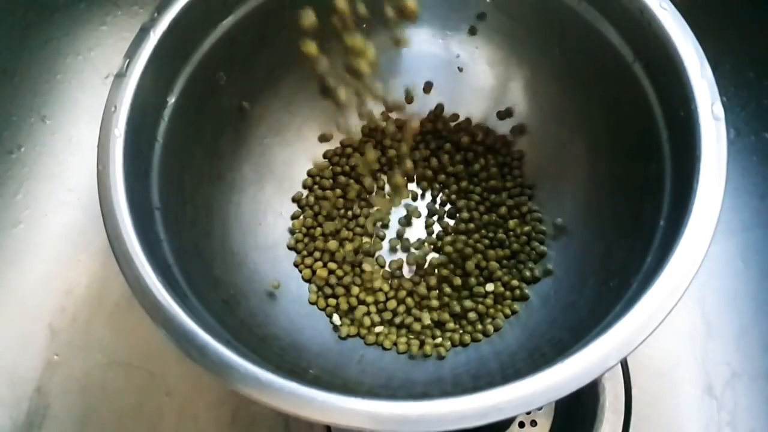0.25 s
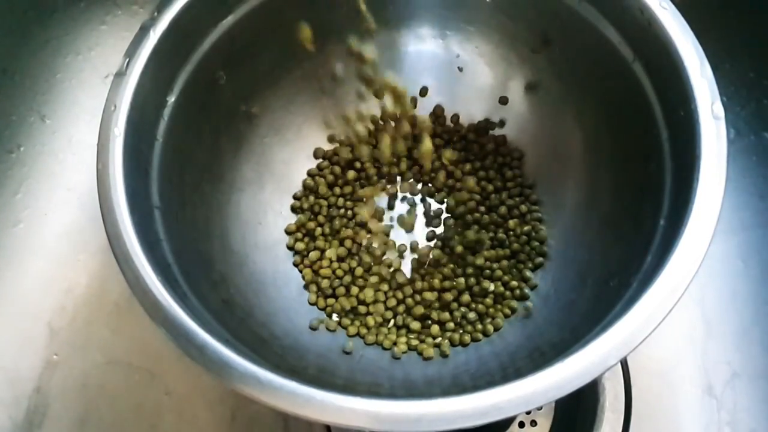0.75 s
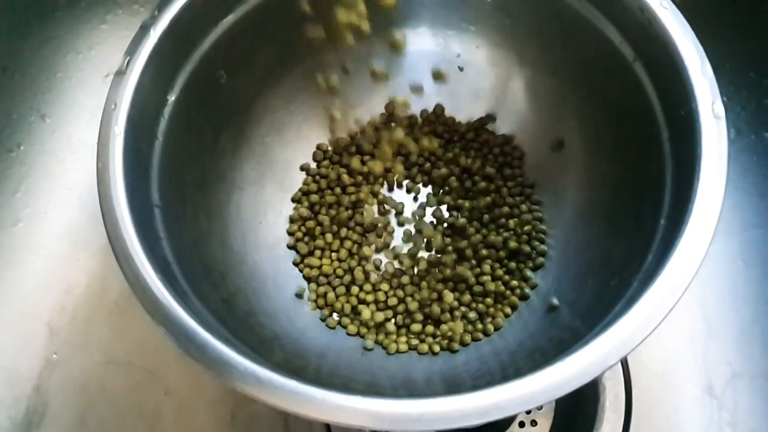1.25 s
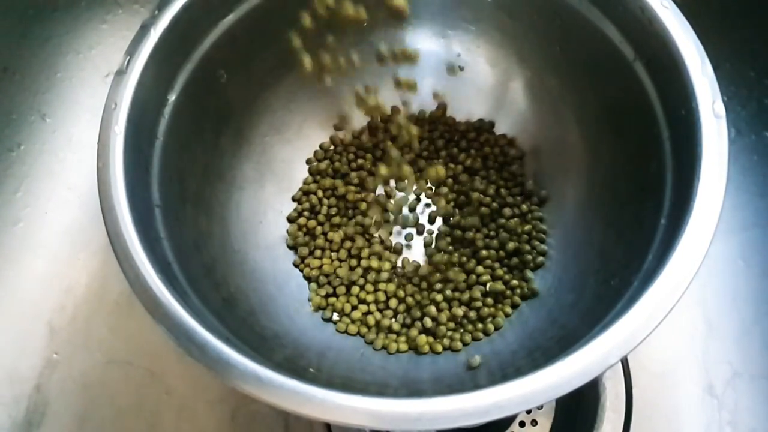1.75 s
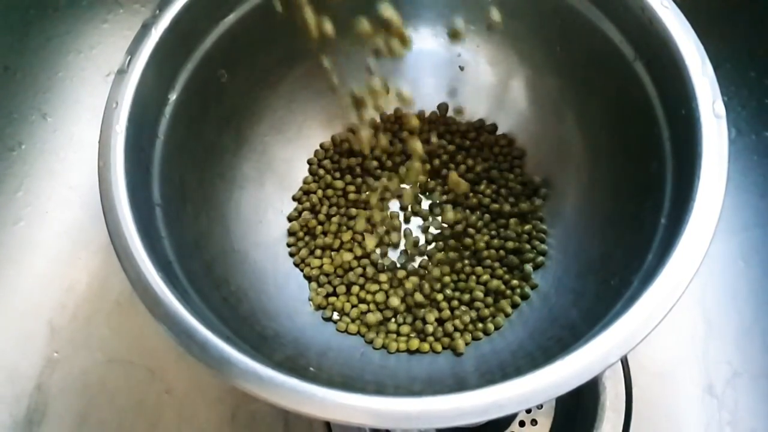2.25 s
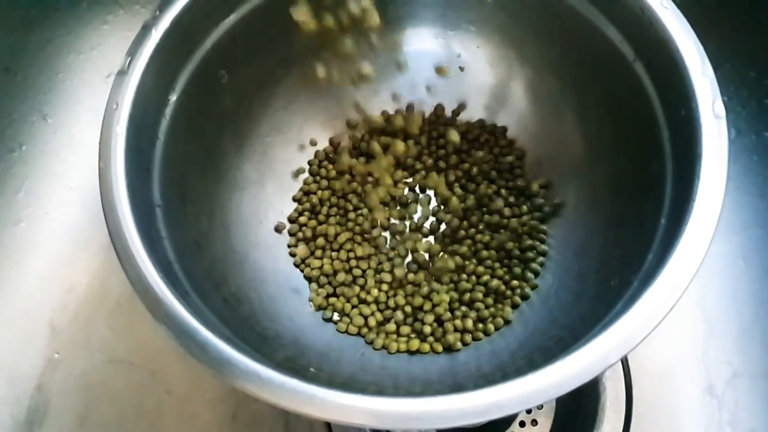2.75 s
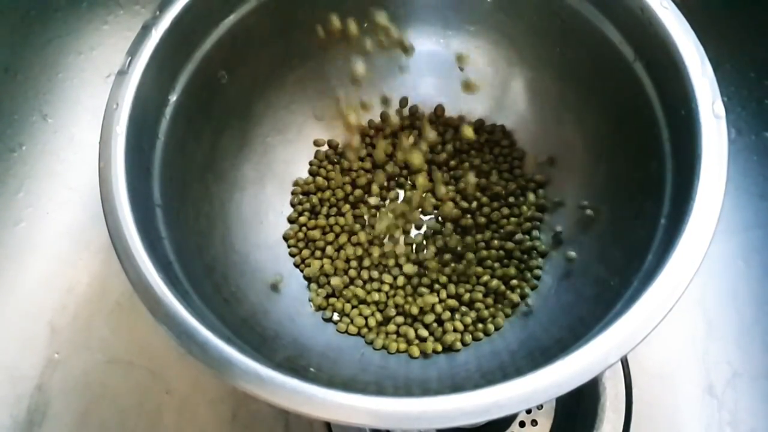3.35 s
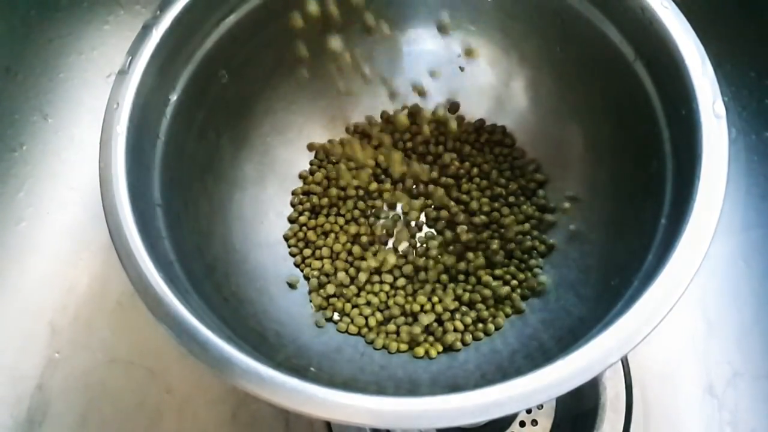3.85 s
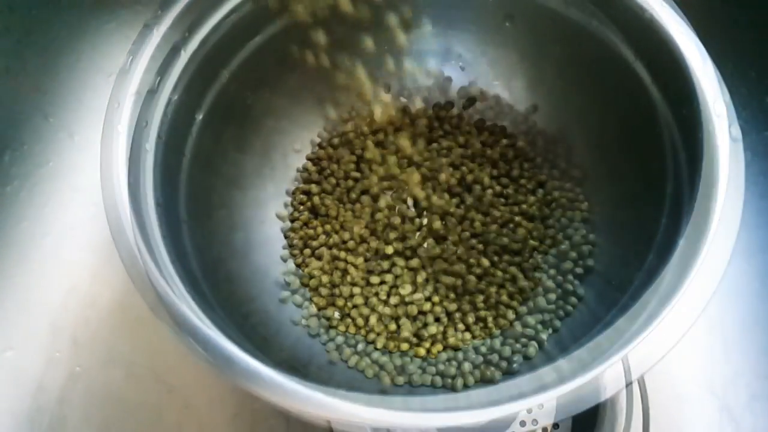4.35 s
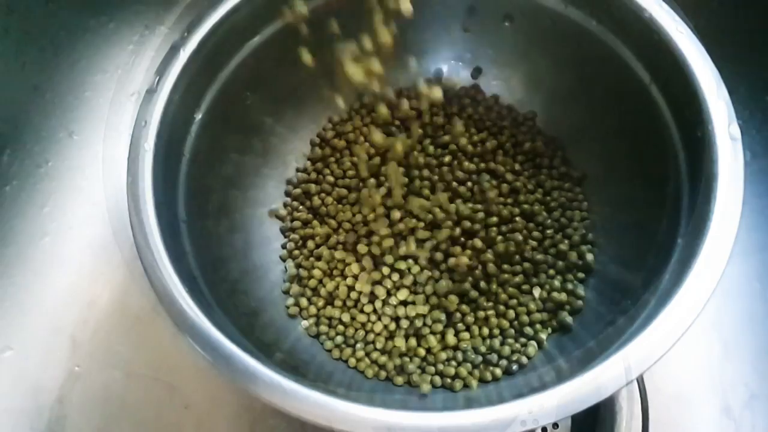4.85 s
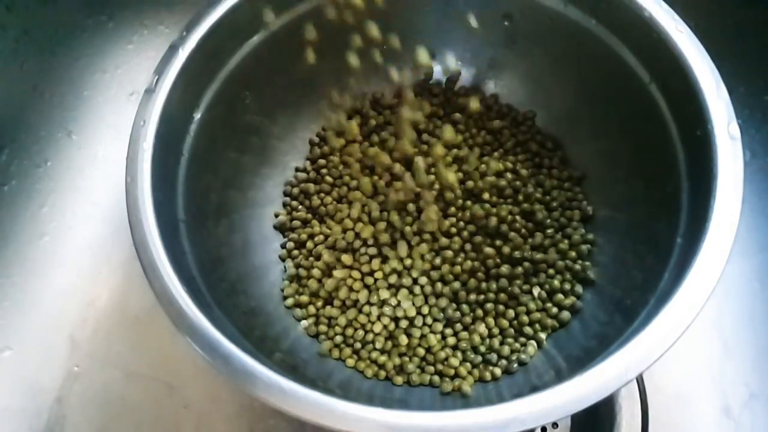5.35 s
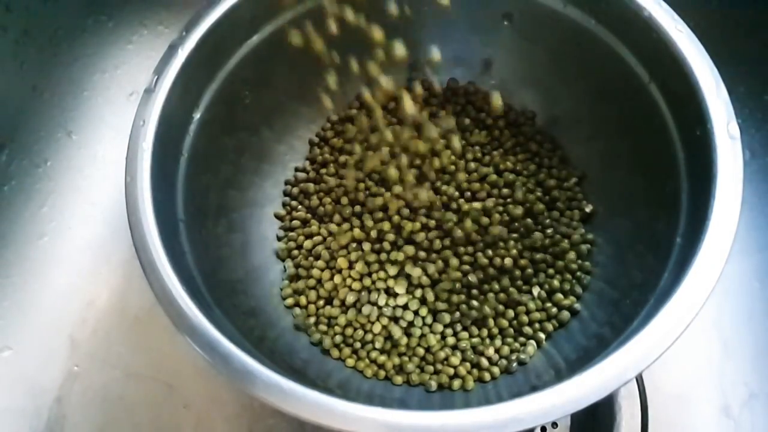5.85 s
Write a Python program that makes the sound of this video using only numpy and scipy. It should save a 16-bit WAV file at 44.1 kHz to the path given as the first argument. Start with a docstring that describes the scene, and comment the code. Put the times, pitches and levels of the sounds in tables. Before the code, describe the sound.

A close, loud clatter of beans poured into a metal bowl in a small hard room. The flow is uneven, with tiny surges and lulls. Early clumps make the steel bottom drum with a low hollow tone while stray beans ping on the sides. Later the bottom is buried, leaving a quieter bean-on-bean patter, low room rumble and a final cluster of metallic knocks. The sound is dull on top, with crackling peaks.

```python
"""Dry beans pour in a slightly lumpy stream, with brief lulls, into a stainless steel bowl near a stereo microphone.
Each bean is an impulse convolved with a short coloured ring: a dry rattle on the heap, a bright ping on the wall.
Clumps excite damped drum modes of the bottom until the growing heap has covered it.
A short diffuse echo and a low room rumble surround the bowl.
The muffled recorder passes little above 3 kHz and clips the loudest peaks with short crackles."""
import sys
import numpy as np
from scipy import signal
from scipy.fft import rfft, irfft
from scipy.io import wavfile
from scipy.ndimage import uniform_filter1d

SR = 44100
rng = np.random.default_rng(int(sys.argv[2]) if len(sys.argv) > 2 else 0)


def generate_wav(sig):
    """Save sig (samples, or channels by samples) to the path in sys.argv[1] as 16-bit PCM at SR."""
    pcm = np.round(np.clip(np.atleast_2d(sig).T, -1, 1) * 32767).astype(np.int16)
    wavfile.write(sys.argv[1], SR, pcm)


N = 269451
TIME = np.arange(N) / SR

# low room rumble, level over time: time_s, level_db
RUMBLE_LEVEL_CURVE = [(0, -39), (3.7, -39.5), (4.3, -45.5), (4.9, -41), (5.25, -34), (6.11, -32.5)]
# low room rumble, relative spectrum: frequency_hz, level_db
RUMBLE_SPECTRUM = [(15, -11), (28, -6), (38, 2.5), (52, -9), (76, -10), (99, 2.5), (125, -5), (170, -8),
                   (300, -10)]
# moments when the stream thins: centre_s, depth_db, half_length_s
STREAM_LULLS = [(0.317, -5.5, 0.09), (0.412, -4.5, 0.026), (0.961, -7.5, .04), (1.035, -5, .02),
                (1.56, -6, .02), (1.203, -4, 0.045), (2.247, -4, .03), (2.508, -6.5, 0.044),
                (2.744, -7.5, .04), (3.293, -5.5, .06), (3.849, -5, 0.022), (4.291, -5, .07),
                (4.652, -4.5, .04), (5.136, -1, 0.15), (5.487, -3.5, 0.037), (5.746, -4.5, .05)]
# drum modes of the bottom, damped by the beans on it: pitch_hz, left_db, right_db, t60_s
BOTTOM_DRUM_MODES = [(226, -21.5, -21.5, 0.05), (269, 8, -1, 0.32), (280, -20.5, -18.5, 0.12),
                     (444, -18, -19.5, 0.12), (551.1, -4, -11.5, 0.27)]
# big clumps that reach the bare bottom: start_s, level_db (relative), length_s
CLUMP_EVENTS = [(0.0, -13.5, 0.012), (0.091, -10, 0.014), (0.149, -13, 0.076), (0.27, -15, 0.014),
                (0.357, -15.5, 0.021), (0.447, -9.5, 0.062), (0.589, -12.5, 0.066), (0.74, -10.5, 0.013),
                (0.809, -14.0, 0.11), (0.979, -15.5, 0.034), (1.052, -8.5, 0.013), (1.244, -8, 0.016),
                (1.494, -15.5, 0.048), (1.674, -14.5, 0.036), (1.797, -18, 0.052), (1.87, -15, 0.074),
                (1.964, -15.5, 0.03), (2.054, -13, 0.0091), (2.102, -13.0, 0.051), (2.303, -18.5, 0.034),
                (2.372, -17, 0.057), (2.646, -19, 0.044), (2.988, -13.5, 0.0074), (3.233, -15, 0.018),
                (3.379, -12.5, 0.018), (3.688, -23, 0.012), (3.945, -20, 0.02), (4.698, -20.5, 0.018)]
# sprays of a few beans that hit the wall hard: start_s, level_db (relative), length_s
SPRAY_EVENTS = [(.172, -17, 0.047), (0.36, -11.5, 0.014), (0.44, -18, 0.046), (0.621, -14, .03),
                (0.838, -17, 0.012), (1.054, -15, 0.037), (1.235, -16.5, .008), (1.345, -16.5, 0.021),
                (1.501, -16.5, .02), (1.576, -16, .012), (1.758, -17.5, 0.029), (2.043, -15, .026),
                (2.105, -17.5, .015), (2.421, -15.5, .025), (2.533, -7.5, .014), (2.766, -21.5, .012),
                (2.828, -16, .02), (3.003, -16, .016), (3.377, -20, .014), (3.456, -13, 0.013),
                (3.76, -13.5, .01), (4.132, -21.5, 0.0068), (4.53, -23, 0.026), (4.92, -19, .01),
                (5.24, -22.5, .024), (5.282, -19, .008), (5.302, -22, .03), (5.357, -23, 0.018),
                (5.524, -17.5, 0.031), (5.604, -17.5, .018), (5.765, -16.5, 0.0092), (5.793, -11, 0.028),
                (5.866, -8.5, .007), (5.955, -10, 0.0092), (6.017, -15, .013), (6.054, -8, 0.013)]
# beans skipping along the wall, many again once the heap leans against it: time_s, level_db (relative)
WALL_FLOW_CURVE = [(0, -16), (.7, -16), (2.1, -20), (2.9, -18.5), (3.75, -22), (4.4, -26), (5.1, -26),
                   (5.7, -23.5), (5.85, -18), (6.11, -20)]
# spectrum of a bean on the steel wall: frequency_hz, left_db, right_db
WALL_SPECTRUM = [(300, -28, -34.5), (940, -29.5, -30.5), (1020, -22, -10), (1109, -1.5, 1.5),
                 (1332, -1.5, -3), (1395, -9, 5), (1556, -9.5, -9.5), (1660, -20.5, -21),
                 (2120, -17, -21.5), (2280, -19.5, -14), (2570, -12.5, -20.5), (2710, -17, -33.5)]
# spectrum of a bean landing on the heap: frequency_hz, left_db, right_db
HEAP_SPECTRUM = [(100, -19, -12.5), (174, -8.5, -1.5), (247, -1, 0.5), (342, -4, -1.5), (540, 1, -1.5),
                 (645, 1, -9), (800, -11, -4.5), (1010, -3.5, -13.5), (1200, -4, 0.5), (1780, -7, -14),
                 (2030, -10, -12.5), (2270, -10.5, -5.5), (2386, -6, -10), (2764, -12, -21)]

# cutoffs of the muffled treble and of the final band edge
MUFFLE_HZ, EDGE_HZ = 2880, 16000
# the heap buries the last bare steel between these times
BURIED_FROM_S, BURIED_BY_S = 3.55, 4.98
# a landing bean, relative: level on the thin first layer, loss as it thickens, further loss on a deep heap
LANDING_DB, THICKEN_DB_PER_S, CUSHION_DB = -18.5, -0.4072, -11
# random surges of the stream: standard deviation and smoothing length
SURGE_DB, SURGE_S = 1.03, 0.032
KNOCK_LEAD_S = .002  # silence ahead of each knock, room for the symmetric filter


def amp(db):
    """Decibels to amplitude gain."""
    return 10 ** (np.asarray(db) / 20)


def follow(curve):
    """Linear interpolation in decibels turns a level curve into a gain for every sample."""
    return amp(np.interp(TIME, *np.transpose(curve)))


def colour(x, hz, db):
    """Spectral shaping: multiply by a gain interpolated along a log-frequency axis."""
    f = np.fft.rfftfreq(x.shape[-1], 1 / SR)
    gain = amp(np.interp(np.log(f + 1), np.log(hz), db))
    return irfft(rfft(x) * gain, x.shape[-1])


def lowpass(x, hz, size):
    """Linear-phase low-pass: both channels are convolved with a windowed sinc."""
    taps = signal.firwin(size, hz, window=("kaiser", 9), fs=SR)
    return signal.oaconvolve(x, taps[None], "same")


def smooth(x, seconds):
    """Two running means in a row, a triangular average."""
    size = max(int(seconds * SR), 2)
    return uniform_filter1d(uniform_filter1d(x, size), size)


def local_rms(pair, seconds):
    """Running root-mean-square level of the middle of a stereo pair."""
    return np.sqrt(abs(smooth(pair.mean(0) ** 2, seconds)) + 1e-14)


def bursts(table, attack_s, ring_on_s):
    """Envelope of volleys: linear rise, hold while the beans land, exponential decay."""
    level = np.zeros(N)
    for start_s, level_db, length_s in table:
        rise = np.clip((TIME - start_s) / attack_s + .5, 0, 1)
        fall = np.exp(-np.maximum(TIME - start_s - length_s, 0) / ring_on_s)
        level = np.maximum(level, amp(level_db) * rise * fall)
    return level


def knock(table, t60, size=4096):
    """High modal density: one impact is coloured, decaying noise, different at each microphone."""
    hz, left_db, right_db = np.transpose(table)
    t = np.arange(size) / SR - KNOCK_LEAD_S
    decay = amp(-60 * abs(t) / t60) * (t >= 0)
    left, right = rng.standard_normal((2, size)) * decay
    ring = np.array([colour(left, hz, left_db), colour(right, hz, right_db)])
    return lowpass(ring, MUFFLE_HZ, size=255)


def shower(table, per_s, spread_db, t60, steady_s, count=24):
    """Superposition of random impacts of unequal force on many spots, levelled to an even flow."""
    out = np.zeros((2, N))
    for _ in range(count):  # one impulse response per spot
        force = amp(spread_db * np.minimum(rng.exponential(1, N), 3))
        sign = rng.choice([-1, 1], N)
        hits = force * sign * (rng.random(N) < per_s / count / SR)
        out += signal.oaconvolve(hits[None], knock(table, t60), axes=1)[:, :N]
    return out / local_rms(out, steady_s)


def rumble():
    """Partial coherence: low room noise, largely shared by both microphones."""
    noise = rng.standard_normal((3, N))
    shared, left, right = colour(noise, *np.transpose(RUMBLE_SPECTRUM))
    pair = (shared + .45 * np.array([left, right])) * amp([[2], [-2]])  # leans to the left
    pair = lowpass(pair, 400, size=801)
    return follow(RUMBLE_LEVEL_CURVE) * pair / pair.mean(0).std()


def kitchen(x, t60=0.1):
    """Diffuse reverberation: a small hard room answers with decaying noise after a short gap."""
    t = np.arange(SR // 2) / SR
    tail = rng.standard_normal((2, len(t))) * amp(-60 * t / t60) * (t > .006)
    return signal.fftconvolve(x, tail / np.linalg.norm(tail[0]), axes=1)[:, :N]


def stream():
    """Modulated flow: a steady gain with small random surges and a few cosine-squared lulls."""
    surges = smooth(rng.standard_normal(N), SURGE_S)
    level_db = SURGE_DB * surges / surges.std()
    for centre_s, depth_db, half_length_s in STREAM_LULLS:
        phase = np.clip((TIME - centre_s) / half_length_s, -1, 1)
        level_db += depth_db * np.cos(np.pi / 2 * phase) ** 2
    return amp(level_db)


def covered():
    """Linear growth of the share of the lower bowl that lies deep under the heap."""
    return np.clip((TIME - BURIED_FROM_S) / (BURIED_BY_S - BURIED_FROM_S), 0, 1)


def landing():
    """Impact cushioning: the growing heap absorbs more and more of each landing."""
    return amp(LANDING_DB + THICKEN_DB_PER_S * TIME + CUSHION_DB * covered())


def bottom(flow, gain_db=-.5, idle_db=-4, idle_db_per_s=-.6, stray_swing=1.8, clatter_db=-9, per_s=900):
    """Modal excitation: clumps and stray beans drive damped drum modes, the strays ever more weakly."""
    t = np.arange(SR // 4) / SR
    drum = np.zeros((2, len(t)))
    for pitch_hz, left_db, right_db, t60 in BOTTOM_DRUM_MODES:
        drum += amp([[left_db], [right_db]]) * amp(-60 * t / t60) * np.cos(2 * np.pi * pitch_hz * t)
    hits = rng.standard_normal((1, N)) * (rng.random(N) < per_s / SR)
    ring = signal.oaconvolve(hits, drum, axes=1)[:, :N]
    ring = ring / local_rms(ring, 0.016)

    volleys = bursts(CLUMP_EVENTS, attack_s=0.008, ring_on_s=0.013)
    # the exponent favours surges, which dig through to the steel
    strays = flow ** stray_swing * landing() * amp(idle_db + idle_db_per_s * TIME)
    drumming = np.hypot(amp(gain_db) * volleys, strays) * ring
    clatter = shower(HEAP_SPECTRUM, per_s=820, spread_db=3.0, t60=.02, steady_s=0.039, count=10)
    return drumming + amp(clatter_db) * volleys * clatter


def sprays(first_bean_db=7, first_t60=0.052, rest_db=-1.0, ring_on_s=0.0054, attack_s=0.0013):
    """Impulse response of the steel: one hard knock opens each spray, other beans follow close behind."""
    chatter = shower(WALL_SPECTRUM, per_s=420, spread_db=2.0, t60=0.077, steady_s=0.0054, count=16)
    out = amp(rest_db) * bursts(SPRAY_EVENTS, attack_s, ring_on_s) * chatter
    for start_s, level_db, _ in SPRAY_EVENTS:
        first = knock(WALL_SPECTRUM, first_t60)
        begin = round((start_s - KNOCK_LEAD_S) * SR)
        part = out[:, begin:][:, :first.shape[1]]  # a view: adding to it adds to out
        part += amp(level_db + first_bean_db) * first[:, :part.shape[1]] / abs(first).max()
    return out


def wall(flow, skip_db=-1.5, smother_db=-8):
    """Contact damping: bright chatter and hard sprays on steel whose lowest modes the heap smothers."""
    chatter = shower(WALL_SPECTRUM, per_s=220, spread_db=2.0, t60=0.058, steady_s=0.018)
    skipping = flow * follow(WALL_FLOW_CURVE) * chatter
    ring = amp(skip_db) * skipping + sprays()
    smothered = colour(ring, [1080, 1220], [smother_db, 0])
    return ring + covered() * (smothered - ring)  # crossfade as the bowl fills


def heap(flow, rebound_db=-11, gain_db=1.02):
    """Power addition of direct landings and falls back from the wall: a dry rattle of beans on beans."""
    rebounds = amp(rebound_db) * follow(WALL_FLOW_CURVE)
    level = flow * np.hypot(landing(), rebounds)
    rattle = shower(HEAP_SPECTRUM, per_s=1100, spread_db=4, t60=0.029, steady_s=0.024)
    return amp(gain_db) * level * rattle


def scene(lowest_hz=192, echo_db=-12):
    """Superposition of room and bowl, which radiates little below its lowest mode."""
    flow = stream()
    bowl = heap(flow) + wall(flow) + bottom(flow)
    bowl = colour(bowl, [lowest_hz / 2, 1.064 * lowest_hz, 1.105 * lowest_hz], [-30, -15, 0])
    return bowl + amp(echo_db) * kitchen(bowl) + rumble()


def record(dry, hiss_db=-88):
    """Band-limiting, then overload: treble is cut, faint hiss added, and peaks clip with a bright crackle."""
    muffled = lowpass(dry, MUFFLE_HZ, size=901)
    hissing = muffled + amp(hiss_db) * rng.standard_normal((2, N))
    return lowpass(np.clip(hissing, -1, 1), EDGE_HZ, size=255)


dry = scene()
out = record(dry)
generate_wav(out)
```